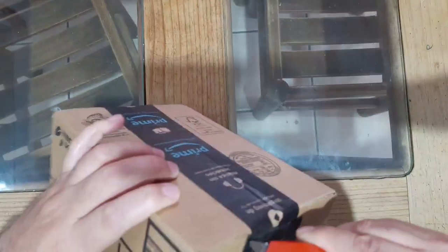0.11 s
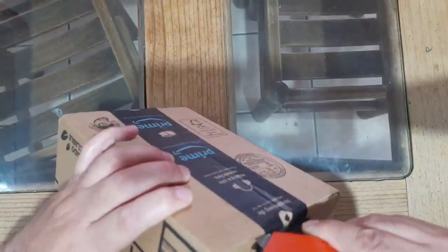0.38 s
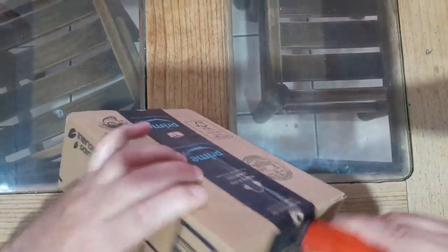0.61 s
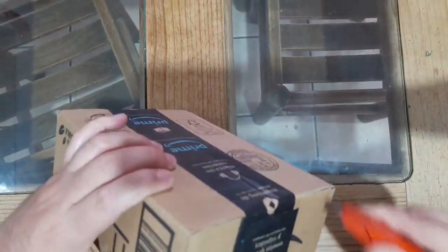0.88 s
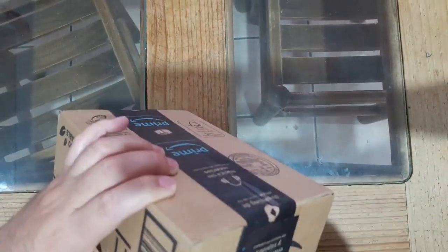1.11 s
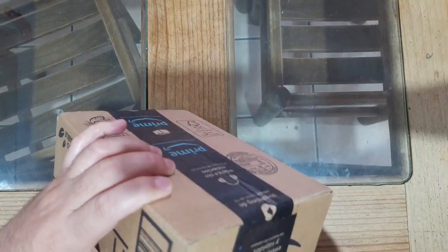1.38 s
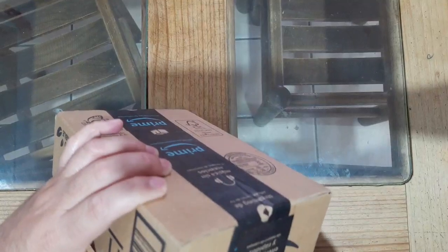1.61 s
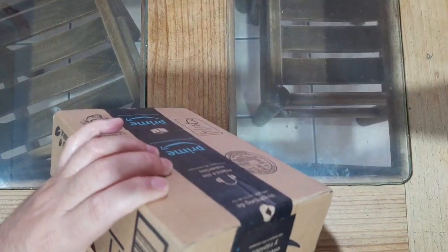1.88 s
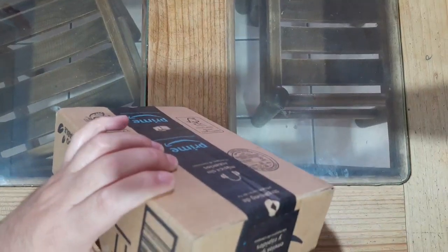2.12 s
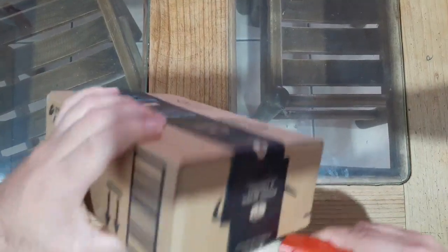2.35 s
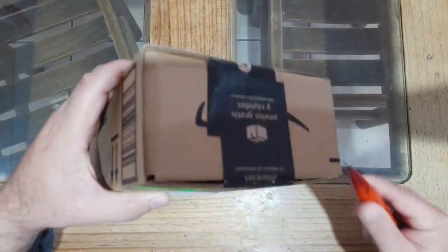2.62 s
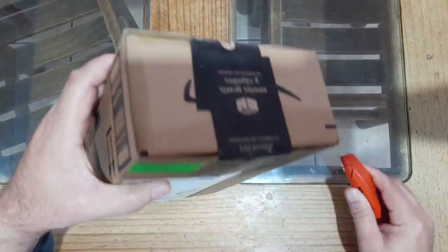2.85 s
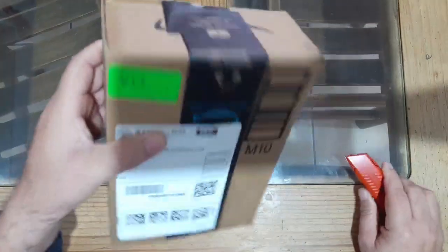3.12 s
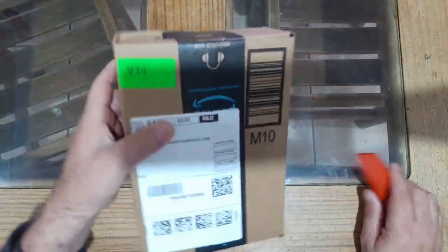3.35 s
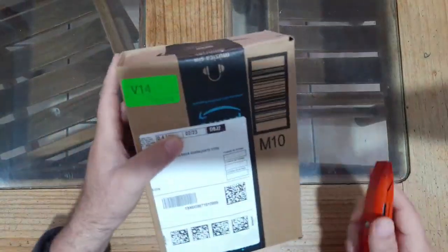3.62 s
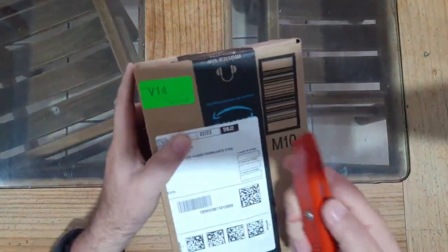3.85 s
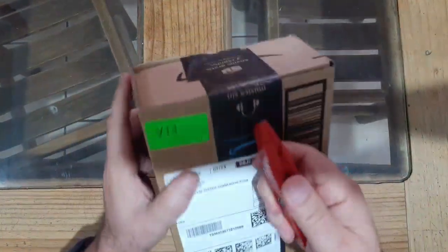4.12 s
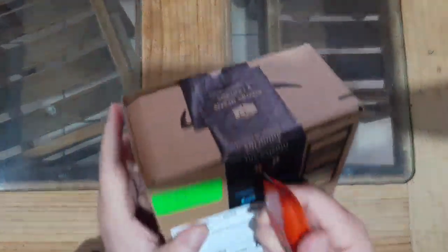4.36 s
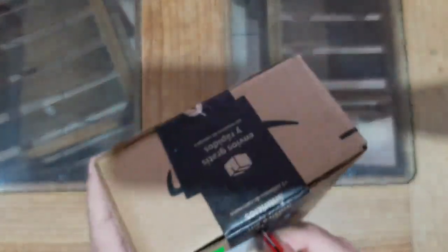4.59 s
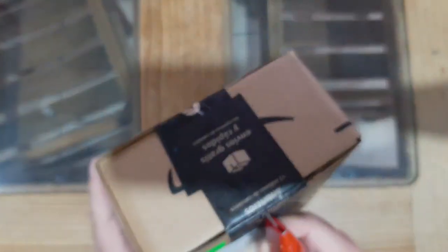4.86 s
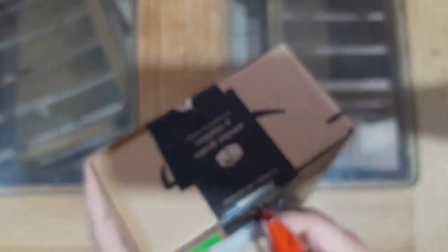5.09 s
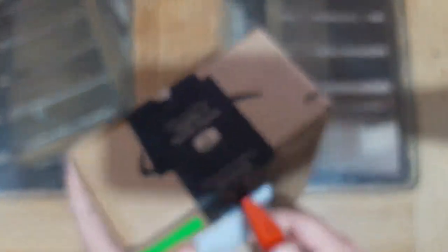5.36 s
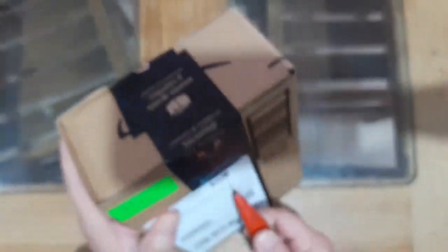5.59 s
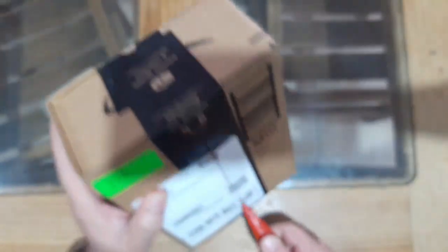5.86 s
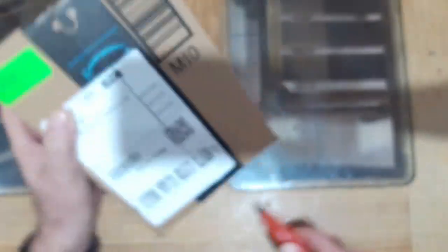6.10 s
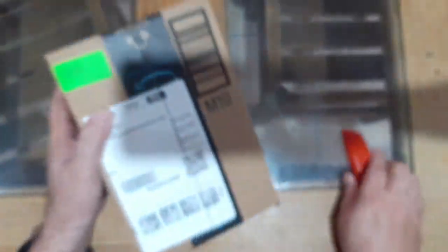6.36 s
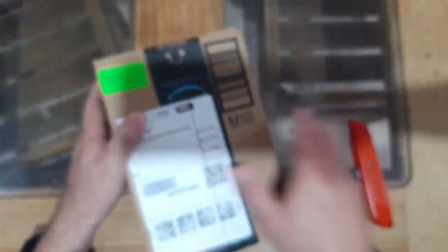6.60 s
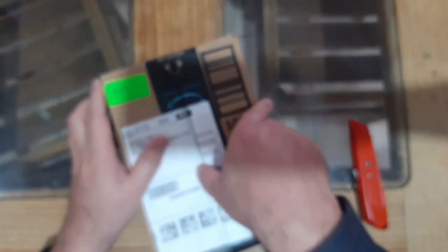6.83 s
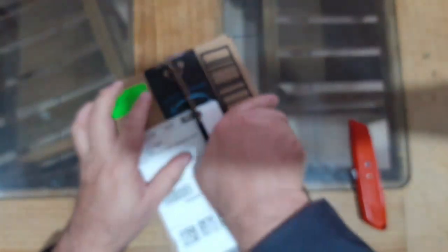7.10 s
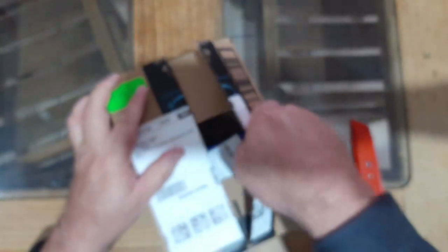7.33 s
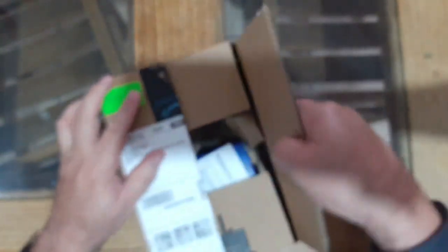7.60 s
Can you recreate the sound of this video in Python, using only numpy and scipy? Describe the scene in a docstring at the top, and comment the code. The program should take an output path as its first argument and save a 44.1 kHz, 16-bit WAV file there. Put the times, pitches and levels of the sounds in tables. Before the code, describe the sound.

A cardboard box is knocked, scuffed and turned in the hands, slit with a long bright rasp, then pulled open with sharp pops after a knife clatters down.

```python
"""A cardboard box on a glass-topped table is knocked and tapped, turned over, slit along its tape and pulled open.
Blows ring its panels as decaying modes; hands and blade drag over the board as grains of friction and hiss.
Tape and knife tick in noise bursts, the blade sounds in rough noise bands, the knife clatters on the glass as modes.
Skin squeaks on tape as a wavering sine and the table sways at one low mode, in a diffuse room with a steady hush.
A close pair of microphones listens from above."""
import sys
import numpy as np
from scipy import signal
from scipy.fft import rfft, irfft
from scipy.io import wavfile
from scipy.ndimage import uniform_filter1d

SR = 44100
rng = np.random.default_rng(int(sys.argv[2]) if len(sys.argv) > 2 else 0)


def dump_mix(stems):
    """Bounce the given channels to the path in sys.argv[1] as a 16-bit WAV at rate SR."""
    frames = np.atleast_2d(stems).T  # one column per channel
    limited = np.clip(frames, -1, 1)  # hard clip at full scale
    pcm = np.round(limited * 32767).astype(np.int16)
    wavfile.write(sys.argv[1], SR, pcm)


def invert_db(level):
    """Linear amplitude ratio for a level in decibels (20 dB per decade), elementwise."""
    return 10 ** (np.asarray(level, dtype=float) / 20)


N = 340275   # length in samples
SIDES = np.array([[1], [-1]])   # a side signal enters left and right with opposite signs

# Knocks on the box. Each row: start in seconds, relative thud of the low panels in dB, pitch in Hz around
# which the struck spot rings, relative ring of the upper panels in dB, relative crack in dB.
KNOCKS = [(0.481, -12, 1560, -12.5, -45), (1.4804, -36, 2050, -23, -28.5), (1.526, -18, 770, -25.5, -25.5),
          (2.065, -36.5, 1700, -36, -35), (2.19, -28, 1620, -31.5, -30), (2.345, -16.5, 660, -19.5, -26),
          (2.366, -19, 650, -18.5, -27), (3.278, -26, 870, -19.5, -34.5), (3.47, -21, 1180, -31, -41.5),
          (4.28, -17, 640, -35, -43.5), (5.409, -11.5, 1230, -21, -16.5), (5.642, -17, 894, -26.5, -35),
          (5.751, -14.5, 1090, -24, -38), (6.09, -23, 670, -32.5, -57), (6.378, -18.5, 846, -31.5, -48),
          (6.737, -21, 973, -32, -63), (6.8, -17, 1000, -40, -50), (6.909, -27.5, 1450, -26.5, -36),
          (6.96, -12, 1360, -18.5, -19.5), (7.277, -31, 1080, -25.5, -30.5), (7.296, -12.5, 1760, -13, -19),
          (7.2966, -29, 526, -15, -50), (7.568, -5, 2450, -10, -12.5), (7.578, -49, 920, -16, -44)]
# Deep modes of the box. Each row: pitch in Hz, relative level in dB, free ring time t60 in seconds.
LOW_PANELS = [(133, -5, 0.1), (185.8, -4.5, 0.096), (243, -0.5, 0.065), (283, -1, 0.061), (324, 0, 0.055),
              (404, -7, 0.064), (582, -0.5, 0.025)]
# Modes evenly spaced in pitch, the higher the shorter. Each row: pitch in Hz, relative level in dB,
# free ring time t60 in seconds.
UPPER_PANELS = [(hz, 0, 30 / hz) for hz in np.geomspace(460, 4400, num=18)]


def knocks():
    """A soft push into the low panels, a hard one into the upper, a crack at the contact; then loose flaps shudder."""
    s, thud_db, spot_hz, ring_db, crack_db = np.transpose(KNOCKS)
    # a held box rings shorter after a blow
    low = [(hz, db, 0.71 * t60) for hz, db, t60 in LOW_PANELS]
    upper = [(hz, db, 0.69 * t60) for hz, db, t60 in UPPER_PANELS]
    thud = strike(low, s, thud_db - 10.5, spread_db=4.5, contact_s=0.00075, lag_s=0.00015,
                  spot_hz=spot_hz / 3.7, octaves=1.54)

    # each blow, then six weaker knocks of the flaps, fainter the later they come
    shudder_s, shudder_db, shudder_db_per_s = 0.074, -15.5, -170
    later = np.c_[np.zeros(len(s)), shudder_s * rng.uniform(.1, 1, (len(s), 6))]
    times = s[:, None] + later
    db = ring_db[:, None] - 4.5 + (later > 0) * shudder_db + shudder_db_per_s * later
    spots = spot_hz[:, None] + 0 * later
    knock = strike(upper, times.ravel(), db.ravel(), spread_db=3.5, contact_s=0.00011, lag_s=0.00015,
                   spot_hz=spots.ravel(), octaves=0.58)

    crack = cracks(s, crack_db, np.full(len(s), 5600.), decay_s=0.0038, alike=0.044)
    return thud + knock + crack


def strike(modes, times, peak_db, spread_db, contact_s, lag_s, spot_hz=None, octaves=1):
    """Every blow excites each mode by chance, most near the struck spot's pitch; the two sides hear it a little apart."""
    at = np.round(np.array(times) * SR).astype(int)
    out = np.zeros((2, N))
    chance = rng.standard_normal((len(at), len(modes), 2))
    contact = np.hanning(max(int(contact_s * SR), 1) + 2)   # a longer contact is softer
    for k, (hz, db, t60) in enumerate(modes):
        # 6 dB weaker at the given number of octaves from the spot
        off_spot_db = 0 if spot_hz is None else -6 * (np.log2(hz / spot_hz) / octaves) ** 2
        size = invert_db(peak_db + db + off_spot_db + spread_db * chance[:, k, 0]) * (-1) ** k
        lag = np.round(lag_s * SR * chance[:, k, 1]).astype(int)
        clicks = np.zeros((2, N))
        clicks[0, at] = size
        clicks[1, at + lag] = size
        push = signal.lfilter(contact / contact.sum(), [1], clicks)
        out += ring(push, hz, t60)
    return out


def ring(clicks, hz, t60):
    """A unit click sets a sine of about height 1 ringing, which falls 60 dB in t60."""
    r, w = invert_db(-60 / (t60 * SR)), 2 * np.pi * hz / SR
    return signal.lfilter([0, np.sin(w)], [1, -2 * r * np.cos(w), r * r], clicks + 1e-18)


def cracks(times, peak_db, centre_hz, decay_s, alike):
    """A burst of noise around its own pitch that tears loose in a moment and dies within milliseconds."""
    rise_s, top_hz = 0.00063, 12300
    out, t = np.zeros((2, N)), np.arange(-200, round(.06 * SR)) / SR
    shape = np.where(t < 0, np.exp(t / rise_s), np.exp(-t / decay_s))
    for s, db, hz in zip(times, peak_db, centre_hz):
        burst = shape * mid_and_side(*rng.standard_normal((2, len(t))), alike)
        band = signal.butter(1, [hz / 3.66, min(hz * 1.89, top_hz)], "band", fs=SR)
        burst = signal.lfilter(*band, signal.lfilter(*band, burst))
        start = round((s + t[0]) * SR)
        out[:, start:start + len(t)] += invert_db(db) * burst
    return out


def mid_and_side(mid, side, alike):
    """Left and right share the mid; the more alike they are, the less side they get."""
    return mid + np.clip(1 - alike, 0, 1) * side * SIDES


# Tape and knife ticking. Each row: start in seconds, relative level in dB, centre pitch in Hz.
TICKS = [(0.28, -32, 5000), (0.355, -34.5, 3900), (0.726, -21.5, 4600), (0.891, -21, 3700),
         (0.959, -26.5, 4670), (1.4852, -21.5, 6500), (1.883, -29.5, 6240), (2.039, -33.5, 5150),
         (2.436, -33.5, 3020), (2.6125, -19.5, 6570), (2.821, -33, 6100), (3.04, -18, 7100),
         (3.725, -34, 5540), (3.743, -30, 7340), (3.9, -29.5, 3120), (3.92, -31, 4100),
         (4.136, -39.5, 2840), (5.241, -35, 4340), (5.28, -37, 3040), (6.115, -33, 5630),
         (6.391, -29, 4160), (6.277, -39, 3500), (2.965, -42.5, 8500), (7.255, -41, 9000),
         (7.46, -43, 2400)]


def ticks():
    """Small dry snaps with no body: bursts of noise alone."""
    return cracks(*np.transpose(TICKS), decay_s=0.0042, alike=0.055)


# Colour of the upper panels under a dragging contact. Each row: pitch in Hz, level in dB.
UPPER_COLOUR = [(460, -8), (1000, -1.5), (1280, -5), (2000, 2), (4400, -10.5)]


def dragging():
    """Clumped grains of friction ring the panels, changing which as the contact moves, and hiss at the surface."""
    low_gain, upper_gain, rasp_gain = friction_levels()
    clumps = invert_db(2.2 * drift(60))
    slips = clumps * grains(3000, 1.9, channels=2)

    low, low_slips = 0, slips[0] + 0.18 * slips[1] * SIDES
    for k, (hz, db, t60) in enumerate(LOW_PANELS):
        low = low + (-1) ** k * ring(invert_db(db) * low_slips, hz, 0.89 * t60)

    upper, upper_slips = 0, slips[1] + 0.53 * slips[0] * SIDES
    for k, (hz, db, t60) in enumerate(UPPER_PANELS):
        upper = upper + (-1) ** k * invert_db(2.0 * drift(7.3)) * ring(upper_slips, hz, t60)
    upper = shaped(upper, UPPER_COLOUR)

    rasp = surface_noise(np.sqrt(clumps) * grains(7000, 3.2, channels=2), alike=.15, patchy_db=3.5)
    # harder rubbing is brighter: a quarter dB more treble per dB of rasp above -34 dB, less below
    top = signal.sosfilt(signal.butter(2, 7300, "high", fs=SR, output="sos"), rasp)
    rasp = rasp + ((rasp_gain / invert_db(-34.0)) ** .25 - 1) * top
    return low_gain * rms_one(low) + upper_gain * rms_one(upper) + rasp_gain * rasp


# The box creaks faintly in the hands. Each row: time in seconds, level in dB before the mix over the layers.
HOLDING = [(0, -62.5), (1.5, -66.5), (2.2, -59.5), (3.2, -66.5), (4.1, -67), (4.7, -76.5), (5.39, -65),
           (6.35, -66), (6.74, -55), (7.12, -61.5), (7.48, -56)]
# Scuffs start at once and die away. Each row: peak in seconds, seconds to fade 20 dB before the layer's
# own stretch, then the levels of low panels, upper panels and surface rasp in dB.
SCUFFS = [(0.448, 0.12, -41, -52, -39.5), (0.487, 0.22, -25, -28.5, -44), (0.616, 0.07, -34, -37.5, -35.5),
          (0.729, 0.27, -36.5, -34, -31), (1.111, 0.25, -42, -41.5, -57.5), (3.287, 0.01, -42, -39.5, -54),
          (6.763, 0.23, -42, -38, -40), (7.59, 0.15, -31.5, -28.5, -40)]
# Sweeps swell and sink. Each row: peak in seconds, seconds to swell 20 dB (if negative, to sink 20 dB),
# then the levels of low panels, upper panels and surface rasp in dB.
SWEEPS = [(0.776, 0.13, -33, -33, -44), (1.86, 0.15, -70, -73, -49.5), (1.949, 0.15, -50, -51, -51.5),
          (2.286, -0.076, -52, -42.5, -49), (2.343, 0.118, -30.5, -32, -31), (2.525, 0.11, -52, -44, -48),
          (3.55, 0.5, -55.5, -54, -64), (4.204, 0.7, -55, -62.5, -57), (4.299, 0.0363, -49.5, -41.5, -50.5),
          (4.504, 0.13, -58, -56.5, -61), (4.964, 0.1, -51.5, -53.5, -63.5), (7.185, 0.37, -41, -47, -51)]
# The blade runs down the tape. Each row: time in seconds, level in dB before the mix over the layers.
CUT = [(5.4, -57), (5.422, -30.5), (5.5, -31), (5.58, -38), (5.8, -37), (5.86, -42), (5.918, -35.5),
       (6.027, -46), (6.049, -30), (6.069, -79)]


def friction_levels():
    """Gains of low panels, upper panels and rasp: the powers of holding, scuffs, sweeps and the cut add up."""
    # one value each for low panels, upper panels, rasp
    fade_stretch = (1.7, 1.2, 0.56)
    holding_mix_db, cut_mix_db = (2.5, 2, -2), (-6.5, 0, -7)
    scuff_rise_s, sink_share = 0.0075, 0.61   # a sweep sinks in this share of its swell time, then stretched
    rubs = [(s, scuff_rise_s, fade, db) for s, fade, *db in SCUFFS]
    rubs += [(s, rise, sink_share * rise, db) for s, rise, *db in SWEEPS]

    t = np.arange(0, N + 32, 32) / SR   # every 32 samples is fine enough
    hold_db = np.interp(t, *np.transpose(HOLDING))
    cut_db = np.interp(t, *np.transpose(CUT), -200, -200)
    gains = []
    for k, stretch in enumerate(fade_stretch):
        power = invert_db(hold_db + holding_mix_db[k]) ** 2 + invert_db(cut_db + cut_mix_db[k]) ** 2
        for s, rise, fade, db in rubs:
            away = np.maximum((s - t) / rise, (t - s) / (stretch * fade))
            power += invert_db(db[k] - 20 * away) ** 2
        gains.append(np.interp(np.arange(N) / SR, t, np.sqrt(power)))
    return gains


def grains(per_s, spread_db, channels):
    """Fibres catch and let go at random moments, a few much harder than the rest."""
    hardness = np.minimum(rng.exponential(1, (channels, N)), 5)
    sizes = invert_db(spread_db * hardness) * rng.choice([-1, 1], (channels, N))
    return sizes * (rng.random((channels, N)) < per_s / SR)


# Colour of the board's surface. Each row: pitch in Hz, level in dB per Hz.
RASP = [(2000, -4.5), (2800, -11), (3700, -8), (8500, -9.5), (16000, -22)]


def surface_noise(mid_side, alike, patchy_db):
    """Bright stereo noise with the colour of the board's surface; its bands wander as the contact shifts."""
    mid, side = shaped(mid_side, [(700, -60)] + RASP)
    noise, out = mid_and_side(mid, side, alike), 0
    edges = np.geomspace(1000, 18000, num=16)   # Hz
    for low, high in zip(edges, edges[1:]):
        band = signal.sosfilt(signal.butter(1, [low, high], "band", fs=SR, output="sos"), noise)
        out = out + invert_db(patchy_db * drift(18)) * band
    return rms_one(out)


def drift(rate):
    """Slow chance: straight lines between random points of spread 1, two points per cycle of the rate in Hz."""
    knots = int(N / SR * rate * 2) + 2
    return np.interp(np.arange(N), np.linspace(0, N, knots), rng.standard_normal(knots))


def rms_one(x):
    """Scales to unit power."""
    return x / np.sqrt(np.mean(x ** 2) + 1e-20)


def shaped(x, points, power=1):
    """Colours x by a (Hz, dB) curve, its dB multiplied by power."""
    hz, db = np.transpose(points)
    bins = np.maximum(np.fft.rfftfreq(N, 1 / SR), 1)
    curve_db = np.interp(np.log(bins), np.log(hz), db)
    return irfft(rfft(x) * invert_db(power * curve_db), N)


# The blade's bands shift as it tilts. Each row: time in seconds, pitch ratio.
BLADE_BEND = [(5.58, 1.02), (5.8, .97), (5.87, 1.08), (5.96, 1.06), (6.05, .93)]
# Centres of the blade's rough bands, in Hz before the bend.
BLADE_BANDS_HZ = (4250, 5500, 8150)


def blade_in_slit():
    """Fibres parting at the edge keep the blade sounding in rough bands, now one, now another."""
    t = np.arange(N) / SR
    cut_db = np.interp(t, *np.transpose(CUT), -200, -200)
    turns = 2 * np.pi * np.cumsum(np.interp(t, *np.transpose(BLADE_BEND))) / SR
    width_hz = 560
    slips = signal.lfilter(*signal.butter(2, width_hz / 2, fs=SR), grains(2700, 2.4, channels=2))
    bands = 0
    for k, hz in enumerate(BLADE_BANDS_HZ):
        own_slips = np.roll(slips, k * SR // 4, axis=1)   # moved in time so that the bands do not move together
        bands = bands + invert_db(4.1 * drift(9)) * own_slips * np.sin(hz * turns)
    # the bands follow a share of the cut's dB
    return invert_db(.55 * cut_db - 26) * rms_one(bands)


# The knife bouncing on glass. Each row: start in seconds, relative level in dB.
CLATTER = [(6.4377, -9), (6.4559, -14), (6.4636, -10), (6.5031, -10.5), (6.757, -21)]
# The knife's handle and blade. Each row: pitch in Hz, relative level in dB, ring time t60 in seconds.
KNIFE = [(2260, 2, 0.037), (2530, -10.5, 0.03), (2704, -6, 0.062), (4694, -9, 0.045), (6200, -11, .03),
         (6630, -7, .03), (8840, -1, .025), (10760, 0, 0.023)]


def knife_drop():
    """The knife lands on the glass and bounces; after each bounce its loose blade rattles in the handle."""
    s, db = np.transpose(CLATTER)
    # each bounce itself, then 19 rattles within 80 ms, fainter the later they come
    later = rng.random((len(s), 20)) * .08 * (np.arange(20) > 0)
    db = (db[:, None] - 250 * later - 9 * (later > 0)).ravel()
    s = (s[:, None] + later).ravel()
    handle = strike(KNIFE, s, db - 11.0, spread_db=5.5, contact_s=.0001, lag_s=0.0001)
    # the glass answers through the box's modes
    glass = strike(UPPER_PANELS + LOW_PANELS, s, db - 22.0, spread_db=4.0, contact_s=.0001, lag_s=0.000089)
    crack = cracks(s, db - 5.0, np.full(len(s), 4000.), decay_s=0.0067, alike=0.042)
    return handle + glass + crack


# Skin slipping on tape. Each row: start in seconds, length in seconds, mean pitch in Hz, peak level in dB.
SQUEAKS = [(2.711, .015, 1180, -44), (2.735, .024, 1320, -44), (2.8, .088, 1290, -49)]


def squeaks():
    """Stick and slip at an unsteady rate near one pitch."""
    out, t = np.zeros(N), np.arange(N) / SR
    for s, length, hz, db in SQUEAKS:
        on = (t > s) & (t < s + length)
        wobble = 1 + .06 * rms_one(uniform_filter1d(rng.standard_normal(N), size=100))[on]
        swell = np.sin(np.pi * (t[on] - s) / length)
        out[on] += invert_db(db) * swell * np.sin(2 * np.pi * np.cumsum(hz * wobble) / SR)
    return out


# Shoves that set the table swaying. Each row: start in seconds, level in dB.
TABLE_SHOVES = [(.48, -36), (0.9, -43)]


def table():
    """The table top sways at one low mode that builds up and dies after each shove."""
    mode_hz, t60_s, build_s = 44.5, 3, 0.022
    out, t = np.zeros(N), np.arange(N) / SR
    for s, db in TABLE_SHOVES:
        since = np.maximum(t - s, 0)
        envelope = invert_db(db - 60 * since / t60_s) * (1 - np.exp(-since / build_s))
        out += envelope * np.sin(2 * np.pi * mode_hz * since)
    return out


def room(x):
    """A diffuse tail, octave by octave, the treble dying first; the bass is shared by both sides."""
    bass_t60_s, wall_cut_hz = 0.57, 8100   # an octave starting at the wall cut would die twice as fast
    t, hz = np.arange(SR // 2) / SR, np.fft.rfftfreq(SR // 2, 1 / SR)
    left, right = rfft(rng.standard_normal((2, len(t))))
    pair = np.array([left, right + (left - right) / (1 + (hz / 500) ** 2)])
    tail = 0
    for low in 80 * 2 ** np.arange(8):
        octave = irfft(pair * ((hz >= low) & (hz < 2 * low)), len(t))
        tail = tail + octave * invert_db(-60 * t * (1 + low / wall_cut_hz) / bass_t60_s)
    tail = tail * np.minimum(t / 0.006, 1)   # builds up in 6 ms
    return signal.fftconvolve(x[None], rms_one(tail) / np.sqrt(len(t)), axes=1)[:, :N]


# Colour of the hush. Each row: pitch in Hz, relative level in dB.
HUSH = [(18, -40), (30, 6), (109, 8), (1160, -23), (1320, -22), (6210, -15), (10500, -20.5), (16000, -37)]


def room_tone():
    """A steady hush of coloured noise, alike at both microphones only in the bass."""
    mid, side = shaped(rng.standard_normal((2, N)), HUSH)
    side = signal.sosfilt(signal.butter(1, 500, "high", fs=SR, output="sos"), side)
    return invert_db(-60.5) * rms_one(mid + side * SIDES)


def scene():
    """Everything on the table, the room sound and the hush; the small box radiates little deep bass."""
    near = knocks() + ticks() + dragging() + blade_in_slit() + knife_drop() + squeaks()
    near = signal.sosfilt(signal.butter(2, 80, "high", fs=SR, output="sos"), near)
    return near + invert_db(-7) * room(near.mean(0)) + table() + room_tone()


# Colour of the left microphone against the right. Each row: pitch in Hz, left over right in dB.
LEFT_OVER_RIGHT = [(60, 1), (950, -2), (3770, -2), (15000, 2.5)]


def low_pass(x):
    """Removes everything above the highest recorded frequency."""
    return signal.sosfilt(signal.butter(12, 16560, fs=SR, output="sos"), x)


def record(dry):
    """The two microphones differ in colour, half the difference each way."""
    left = shaped(dry[0], LEFT_OVER_RIGHT, power=.5)
    right = shaped(dry[1], LEFT_OVER_RIGHT, power=-.5)
    pair = np.array([left, right])
    return low_pass(pair)


dry = scene()
out = record(dry)
dump_mix(out)
```